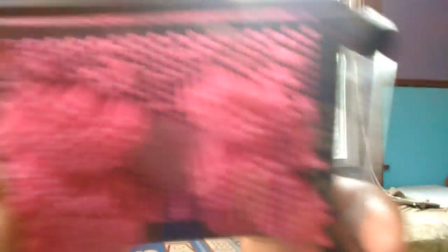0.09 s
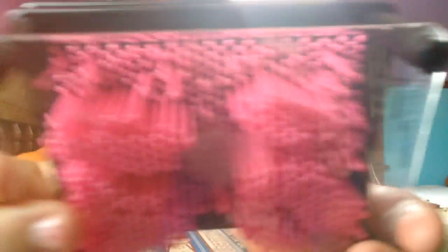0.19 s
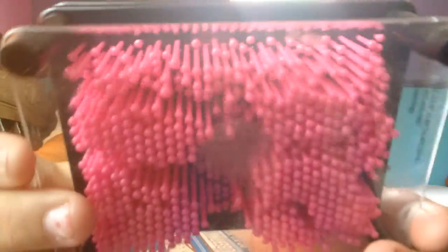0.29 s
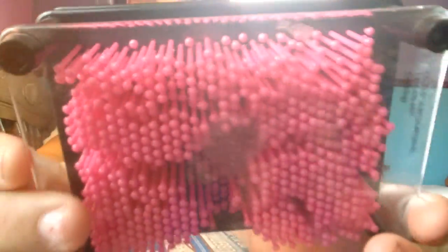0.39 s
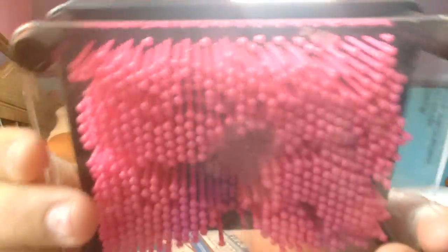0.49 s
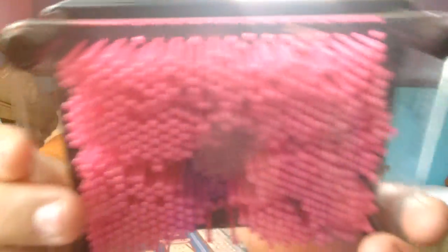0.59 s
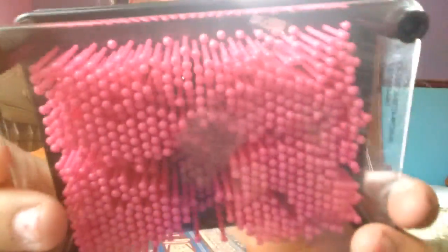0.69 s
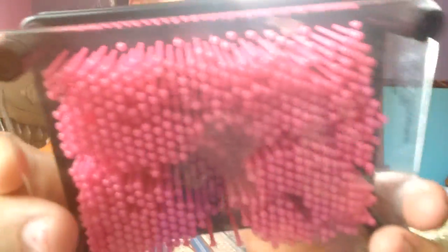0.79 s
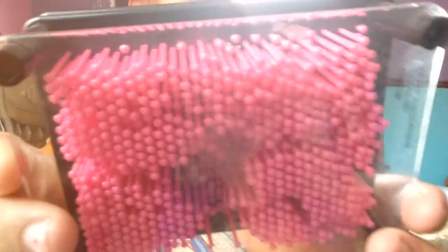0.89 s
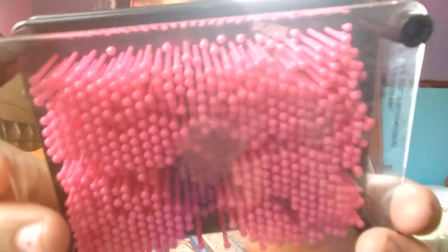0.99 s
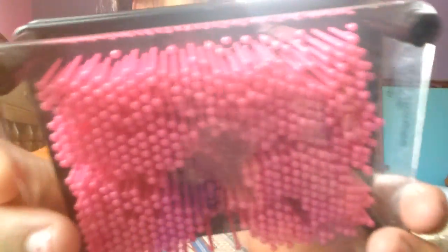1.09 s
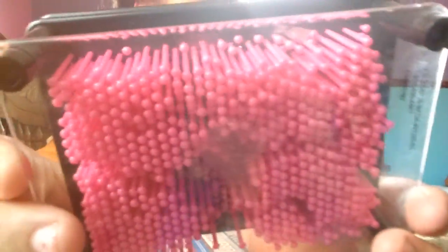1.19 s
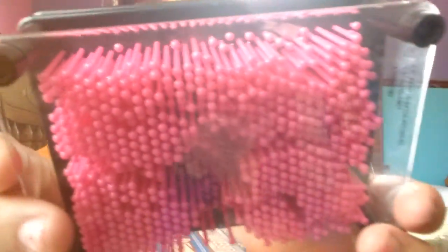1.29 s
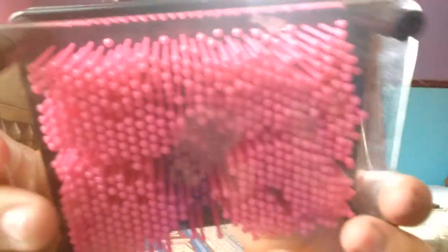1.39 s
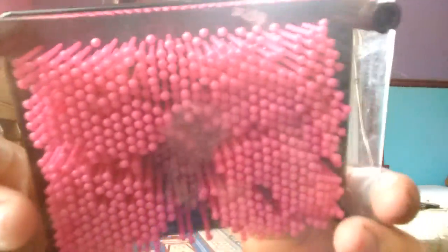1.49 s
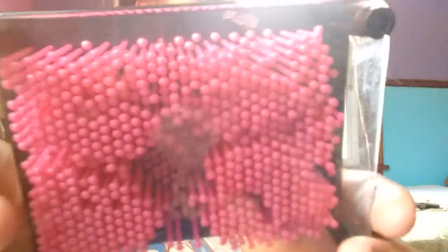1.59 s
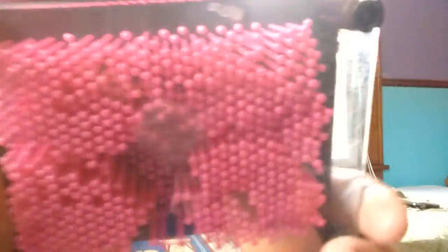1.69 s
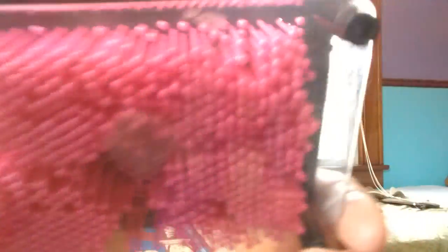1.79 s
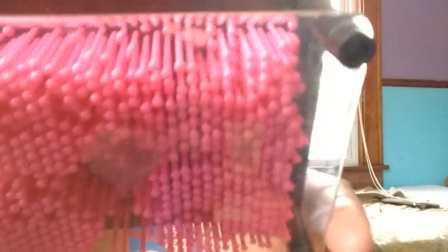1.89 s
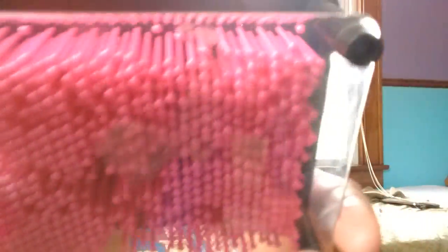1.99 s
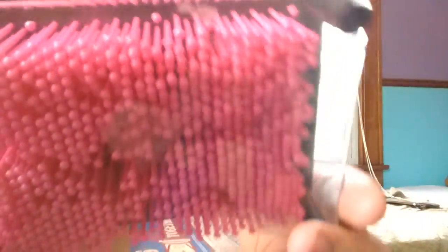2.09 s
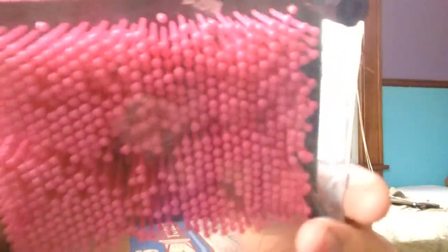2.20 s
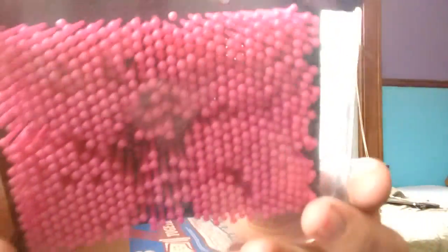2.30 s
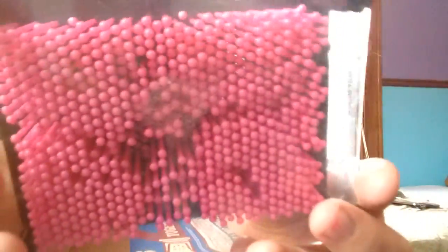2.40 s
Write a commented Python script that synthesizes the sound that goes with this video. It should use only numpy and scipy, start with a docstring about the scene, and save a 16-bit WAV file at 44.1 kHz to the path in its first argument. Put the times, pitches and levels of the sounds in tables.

```python
"""Plastic pins sliding and landing in a pin art toy, tilted in the hands close to the microphone.
They hit their stops singly or in dense runs where a whole patch falls. Each contact is a short bright
tick with a clack and a faint knock of the frame, and the other pins ring along. Loose pins rustle
between the falls and the frame bumps dully in the hands. The place is a small, quiet room."""
import sys
import numpy as np
from scipy import signal
from scipy.fft import rfft, irfft, next_fast_len
from scipy.io import wavfile

SR = 44100
rng = np.random.default_rng(int(sys.argv[2]) if len(sys.argv) > 2 else 0)


def wav_out(sig):
    """Save sig, one row per channel (or a flat mono array), as 16-bit PCM at SR to the path in sys.argv[1]."""
    wavfile.write(sys.argv[1], SR, np.round(np.clip(np.atleast_2d(sig).T, -1, 1) * 32767).astype(np.int16))


N = 105840

# Single pins hitting their stops, close to the microphone. Each row: start in seconds, treble level
# in dB before the tick's gain, clack in dB against that level, knock in dB against the clack.
PIN_LANDINGS = [(0.1074, -38, -6.5, -16.5), (0.1486, -42.5, 1.5, -26), (0.1529, -31.5, -7.5, -23),
                (0.175, -34.5, -13, -27), (0.1949, -21.5, -11, -17.5), (0.2663, -12.5, -9, -15.5),
                (0.2857, -13.5, -8.5, -21.5), (0.3033, -23, -5, -14.5), (0.3157, -19, -13, -14),
                (0.3223, -16.5, -8, -27.5), (0.354, -29.5, -4.5, -19.5), (0.3587, -34, -0.5, -9),
                (0.3617, -18, -13.5, -16.5), (0.3733, -13, -15.5, -9), (0.4156, -25, -4.5, -13),
                (0.449, -28.5, -8.5, -13.5), (0.56, -53.5, 11, -28.5), (0.5807, -57, 13, -7),
                (0.633, -35.5, -5.5, -12), (0.664, -34.5, -9, -21), (0.6711, -24.5, -9.5, -12),
                (0.6755, -36.5, -8.5, -5.5), (0.7133, -35, -4, -9), (0.718, -20.5, -10, -14),
                (0.7993, -44, -22, -9), (0.8323, -46, -19.5, -13), (1.1107, -28.5, -11.5, -11),
                (1.1421, -31.5, -11, -12), (1.1681, -36.5, -7.5, -9.5), (1.4505, -43, -13, -6),
                (1.5214, -42, -10, -11.5), (1.5897, -54, -19.5, -7.5), (1.6109, -59, -15, -8),
                (1.633, -57, -25, -4.5), (1.9102, -56.5, -3, -18), (1.9439, -50.5, 5.5, -29),
                (1.953, -49, 0, -38.5), (1.961, -45.5, -0.5, -24), (1.997, -33.5, -2.5, -24.5),
                (2.0217, -19, -18, -8.5), (2.0332, -20.5, -9, -25.5), (2.0381, -40.5, 6, -14),
                (2.062, -15.5, -11, -14), (2.1144, -21, -13.5, -8), (2.1333, -27, -2.5, -10.5),
                (2.1428, -22.5, -10, -17), (2.1733, -38.5, 6.5, -14.5), (2.1834, -24, -7, -16),
                (2.2015, -31.5, -2, -10.5), (2.295, -46.5, 3, -11)]


def single_pins():
    """One blow for each pin that reaches its stop."""
    out = np.zeros(N)
    for start, treble_db, clack_db, knock_db in PIN_LANDINGS:
        add(out, start, landing(contact(treble_db), 0, treble_db, clack_db, knock_db))
    return out


# Patches of pins landing together, just as close. Each row: start in seconds, length in seconds,
# then treble, clack and knock in dB as for the single pins.
PATCH_FALLS = [(0.2401, 0.004, -18, -7.5, -13.5), (0.2456, 0.0084, -14, -11, -18.5),
               (0.2596, 0.0031, -21.5, -8, -17), (0.272, 0.009, -26, -11, -14),
               (0.289, 0.0035, -12, -11, -16), (0.296, 0.004, -23, -7, -13),
               (0.3301, 0.0067, -23.5, -11, -10), (0.378, 0.02, -17.5, -12, -13),
               (0.404, 0.008, -21.5, -5.5, -21), (0.423, 0.004, -22, -10, -18),
               (0.43, 0.0067, -38.5, 3, -16.5), (2.0464, 0.0078, -24.5, -6, -17),
               (2.0716, 0.005, -18, -13, -10), (2.081, 0.0058, -21, -7.5, -13.5),
               (2.091, 0.0061, -21, -9, -12), (2.1, 0.0087, -23.5, -4, -13), (2.3847, 0.0096, -43, 1, -14),
               (2.3943, 0.0052, -29.5, -3.5, -19)]
PATCH_HITS_PER_S, MOST_PINS = 850, 24
LEADING_HIT_DB, HIT_SPREAD_DB = -1, 7.5


def falling_patches():
    """A leading blow, then uneven ones within milliseconds, each from a different pin."""
    out = np.zeros(N)
    for start, length, treble_db, clack_db, knock_db in PATCH_FALLS:
        pins = [contact(treble_db) for _ in range(MOST_PINS)]
        count = int(np.clip(length * PATCH_HITS_PER_S + 1, 2, MOST_PINS))
        jitter, weakness, polarity = rng.random((3, MOST_PINS))[:, :count]
        onsets = (np.arange(count) + jitter - jitter[0]) / count * length
        gains = np.sign(polarity - .5) * from_db(np.r_[LEADING_HIT_DB, -HIT_SPREAD_DB * weakness[1:]])
        parts = np.zeros((3, SR // 10))
        for i, gain, pin in zip((onsets * SR).astype(int), gains, pins):
            parts[:, i:i + pin.shape[1]] += gain * pin
        add(out, start, landing(parts, length, treble_db, clack_db, knock_db))
    return out


# The colour of a pin's click through the close microphone, with its resonance near 8.2 kHz.
# Each row: frequency in Hz, relative level in dB.
CLICK_COLOUR = [(100, -44.5), (250, -36.5), (400, -25.5), (1000, -27), (1450, -28.5), (2100, -23.5),
                (4200, -18), (5000, -19.5), (5700, -16), (6500, -18), (7500, -7), (8150, -7.5),
                (8900, -8.5), (9900, -10.5), (10500, -19.5), (11000, -9.5), (11700, -20.5), (13300, -29.5),
                (14300, -19), (15500, -34.5)]
CHATTER_DB, CHATTER_T60_S = -16, 0.011
HARD_BLOW_DB, TOP_DB_PER_DB, BODY_DB_PER_DB = -19.5, 0.5, 0.8
KNOCK_BELOW_HZ, TREBLE_ABOVE_HZ = 2050, 6515
TICK_HZ, TICK_SPREAD, SWELL_S = 8172, .025, 0.00032
REBOUND_S, REBOUND_DB = .002, -7.5


def contact(treble_db):
    """One blow as treble, clack and knock: the pin buzzes in its hole, a tick swells and rebounds."""
    t = np.arange(SR // 40) / SR
    blow = from_db(CHATTER_DB - 60 * t / CHATTER_T60_S) * rng.standard_normal(len(t))
    blow[0] = 1
    # Lighter blows lose their top, hardly move the frame and are purer in tone.
    light_db = min(treble_db - HARD_BLOW_DB, 0)
    top_db = TOP_DB_PER_DB * light_db
    touch_colour = [(300, BODY_DB_PER_DB * light_db), (726, 0), (10800, 0), (13500, top_db)]
    sound = coloured(coloured(blow, CLICK_COLOUR), touch_colour)
    treble = unit_energy(filtered(sound, TREBLE_ABOVE_HZ, "high", order=5))
    clack = unit_energy(filtered(sound, [KNOCK_BELOW_HZ, TREBLE_ABOVE_HZ], "band", order=4))
    knock = unit_energy(filtered(sound, KNOCK_BELOW_HZ, "low", order=4))
    pitch_hz = TICK_HZ * rng.normal(1, TICK_SPREAD)
    swell = t * np.exp(-t / SWELL_S) * np.cos(2 * np.pi * pitch_hz * t)
    tick = from_db(-.5 - .5 * top_db) * unit_energy(signal.fftconvolve(treble, swell)[:len(t)])
    lag = int(REBOUND_S * rng.uniform(.7, 1.3) * SR)
    rebound = from_db(REBOUND_DB) * np.pad(tick, (lag, 0))[:len(t)]
    return np.array([treble + tick + rebound, clack, knock])


CLICK_S, TICK_GAIN_DB = 0.0027, 2.5


def landing(parts, length, treble_db, clack_db, knock_db):
    """Mix treble, clack and knock over the fall's length plus one click; the ticks lift the treble."""
    levels_db = np.cumsum([treble_db, clack_db, knock_db]) + [TICK_GAIN_DB, 0, 0]
    gains = from_db(levels_db) * np.sqrt((length + CLICK_S) * SR)
    return sum(gain * unit_energy(part) for gain, part in zip(gains, parts))


# Loose pins rustling in their holes, near the microphone. Each row: time in seconds, level in dB.
RUSTLE_LEVEL = [(0, -69), (.08, -71.5), (0.172, -48.5), (.23, -49), (.41, -33), (.5, -47.5), (0.618, -66.5),
                (.76, -49), (0.881, -85), (0.999, -82), (1.09, -68.5), (1.2, -62.5), (1.299, -89.5),
                (1.549, -74), (1.66, -79), (1.8, -75), (1.9, -86.5), (2.0, -56), (2.1, -35), (2.25, -54),
                (2.37, -70)]
# The colour of that rustle. Each row: frequency in Hz, relative level in dB.
RUSTLE_COLOUR = [(1000, -30), (2200, -24), (6500, -19.5), (8300, -3.5), (9500, -16), (15000, -35.5)]
PEAK_TOUCHES_PER_S = 5600
THINNING = 0.65   # share of a fall in level by which the touches also get rarer


def sliding_pins():
    """Light touches of sliding pins: a dense rush when loud, separate grains when faint."""
    level_db = np.interp(np.arange(N) / SR, *np.transpose(RUSTLE_LEVEL))
    chance = PEAK_TOUCHES_PER_S / SR * from_db(THINNING * (level_db - level_db.max()))
    touches = (rng.random(N) < chance) * rng.choice([-1, 1], N) / np.sqrt(chance)
    touches *= from_db(np.minimum(rng.exponential(1, N), 2))   # uneven by up to 2 dB
    return unit_energy(coloured(touches, RUSTLE_COLOUR)) * np.sqrt(N) * from_db(level_db)


# The other pins ringing along inside the toy. Each row: pitch in Hz, width in Hz, gain in dB,
# seconds to fall by 60 dB.
RING_CLUSTERS = [(8420, 600, -10, 0.25), (11080, 260, -12.5, 0.21)]


def ringing_pins(toy):
    """Hundreds of nearly alike pins ring in sympathy: a dense cluster of modes around each pitch."""
    t = np.arange(SR) / SR
    response = np.zeros(SR)
    for hz, width, db, t60 in RING_CLUSTERS:
        cluster = filtered(rng.standard_normal(SR), [hz - width / 2, hz + width / 2], "band", order=2)
        ring = unit_energy(cluster * from_db(-60 * t / t60))
        response += ring * from_db(db) * np.sqrt(2 * width / SR)
    return signal.fftconvolve(toy, response)[:N]


# The frame in the hands, faint even this close. Each row: start in seconds, pitch in Hz, level in dB.
FRAME_BUMPS = [(.243, 167, -61), (0.289, 160, -59.5), (.376, 400, -50), (.775, 425, -65)]
BUMP_SWELL_S = .014


def frame_bumps():
    """The handled frame gives soft, low bumps, an octave wide, that swell and die away."""
    out = np.zeros(N)
    t = np.arange(SR // 5) / SR
    for start, hz, db in FRAME_BUMPS:
        noise = filtered(rng.standard_normal(len(t)), [hz / np.sqrt(2), hz * np.sqrt(2)], "band", order=3)
        bump = unit_energy(noise * t * np.exp(-t / BUMP_SWELL_S))
        add(out, start, bump * from_db(db) * np.sqrt(2 * BUMP_SWELL_S * SR))
    return out


# The decay of the small room. Each row: frequency in Hz, seconds to fall by 60 dB.
TAIL_DECAY = [(200, 0.72), (8000, 0.14), (15000, 0.23)]
# The room's tail at the microphone. Each row: frequency in Hz, level in dB against the direct sound.
TAIL_LEVEL = [(800, -9), (2500, -15.5), (15000, -11.5)]
# Early room echoes of the bright tick. Each row: delay in seconds, gain in dB within the echo band.
EARLY_ECHOES = [(.0097, -16), (0.0135, -13)]
ECHO_BAND_HZ, TAIL_RISE_S = (7900, 8800), 0.0063


def room(toy):
    """Two early echoes of the tick and a diffuse tail that dies band by band."""
    t = np.arange(SR) / SR
    rise = np.clip(t / TAIL_RISE_S, 0, 1) ** 2
    edges_hz = np.geomspace(80, 18000, 12)
    tail = np.zeros(SR)
    for low, high in zip(edges_hz, edges_hz[1:]):
        hz = np.sqrt(low * high)
        noise = filtered(rng.standard_normal(SR), [low, high], "band", order=3)
        band = unit_energy(noise * from_db(-60 * t / at_hz(TAIL_DECAY, hz)) * rise)
        tail += band * from_db(at_hz(TAIL_LEVEL, hz)) * np.sqrt(2 * (high - low) / SR)
    echoes = np.zeros(SR)
    for delay, db in EARLY_ECHOES:
        echoes[int(delay * SR)] += from_db(db)
    return signal.fftconvolve(toy, tail + filtered(echoes, ECHO_BAND_HZ, "band", order=2))[:N]


# Room tone at the microphone, far below the toy. Each row: frequency in Hz, relative level in dB.
ROOM_TONE_COLOUR = [(50, -5), (120, 4.5), (200, -0.5), (350, -5), (1000, -14.5), (2400, -24.5),
                    (6500, -27.5), (8300, -18.5), (9700, -28), (16000, -37.5)]
ROOM_TONE_DB = -75


def room_tone():
    """Quiet, steady rumble and hiss."""
    noise = coloured(rng.standard_normal(N), ROOM_TONE_COLOUR)
    return from_db(ROOM_TONE_DB) * np.sqrt(N) * unit_energy(noise)


def from_db(db):
    """Decibels to gain."""
    return 10 ** (np.asarray(db) / 20)


def unit_energy(x):
    """Scale to a total energy of one."""
    return x / np.sqrt(np.sum(x ** 2) + 1e-20)


def at_hz(points, hz):
    """Read a table on a log-frequency axis."""
    table_hz, values = np.transpose(points)
    return np.interp(np.log(np.maximum(hz, 1)), np.log(table_hz), values)


def coloured(x, points):
    """Causal (minimum-phase) filter with the given spectrum."""
    size = 2 * next_fast_len(len(x))
    gains = from_db(at_hz(points, np.fft.rfftfreq(size, 1 / SR)))
    cepstrum = irfft(np.log(gains))
    cepstrum[1:size // 2] *= 2
    cepstrum[size // 2 + 1:] = 0
    return irfft(rfft(x, size) * np.exp(rfft(cepstrum)))[:len(x)]


def filtered(x, hz, kind, order):
    """Low-, high- or band-pass with a flat passband."""
    return signal.sosfilt(signal.butter(order, hz, kind, fs=SR, output="sos"), x)


def add(out, start, sound):
    """Mix a sound in at a start time in seconds."""
    i = int(np.clip(start * SR, 0, N - 1))
    out[i:i + len(sound)] += sound[:N - i]


def scene():
    """The toy close up with the small room behind it, on one microphone."""
    toy = single_pins() + falling_patches() + sliding_pins() + frame_bumps()
    return (toy + ringing_pins(toy) + room(toy) + room_tone())[None]


PEAK_CEILING, CUTOFF_HZ = .75, 15700


def record(dry):
    """The highest peaks are rounded and the top is cut."""
    rounded = dry / (1 + (dry / PEAK_CEILING) ** 6) ** (1 / 6)
    return signal.sosfilt(signal.ellip(10, .2, 80, CUTOFF_HZ, fs=SR, output="sos"), rounded)


dry = scene()
out = record(dry)
wav_out(out)
```